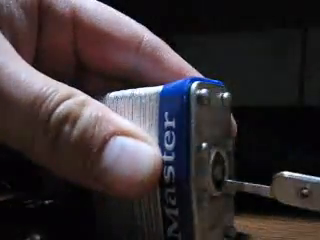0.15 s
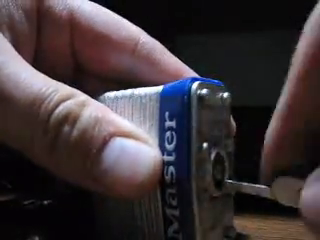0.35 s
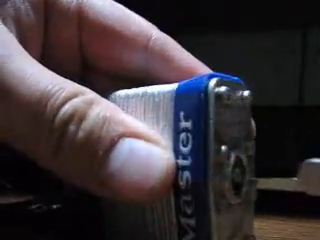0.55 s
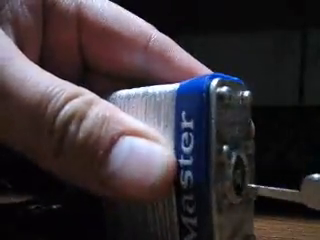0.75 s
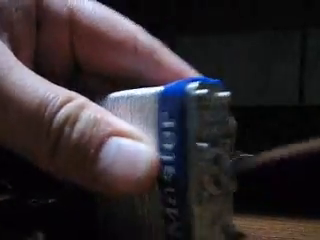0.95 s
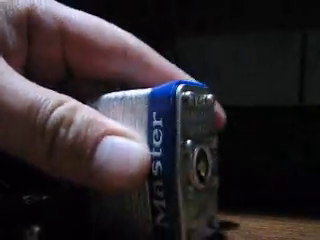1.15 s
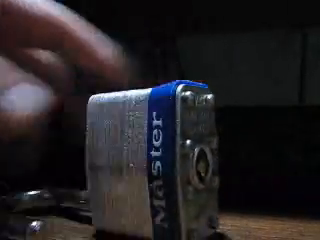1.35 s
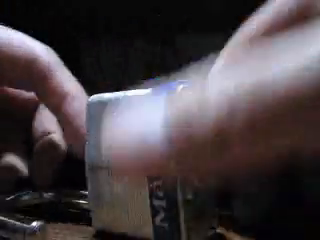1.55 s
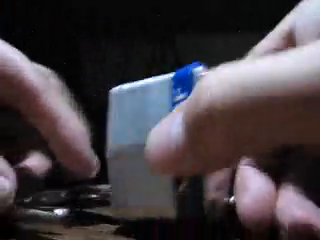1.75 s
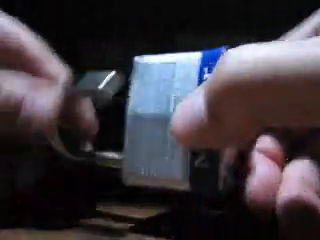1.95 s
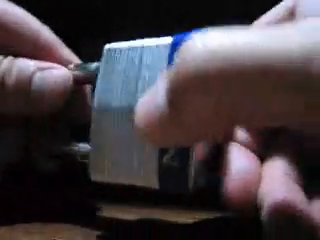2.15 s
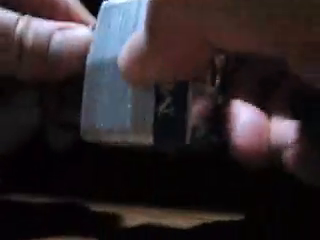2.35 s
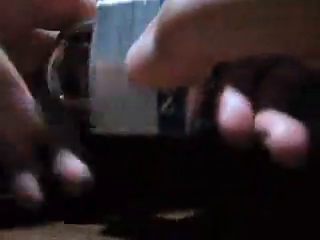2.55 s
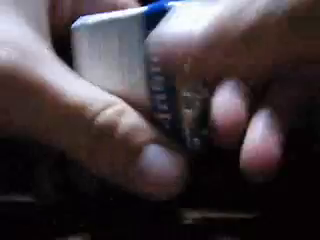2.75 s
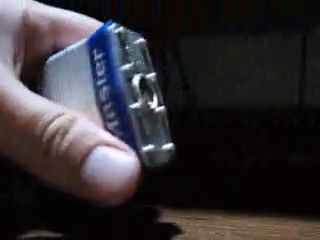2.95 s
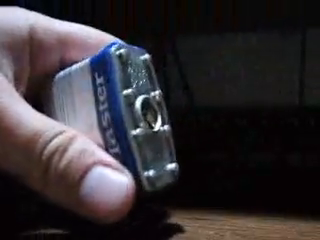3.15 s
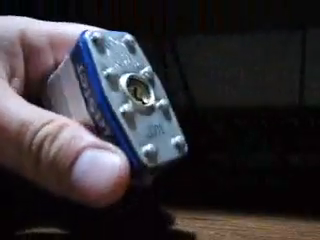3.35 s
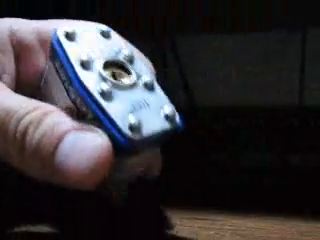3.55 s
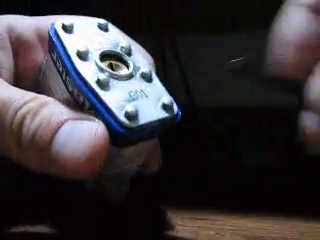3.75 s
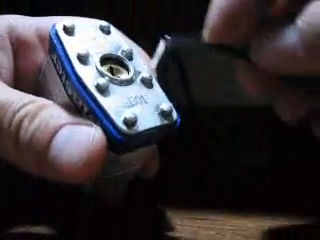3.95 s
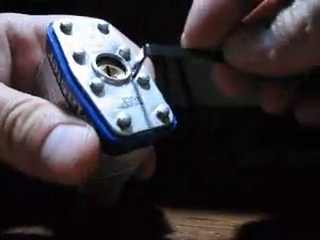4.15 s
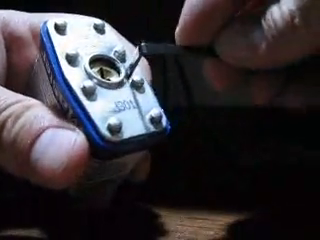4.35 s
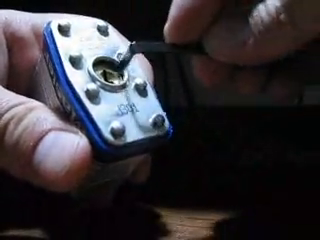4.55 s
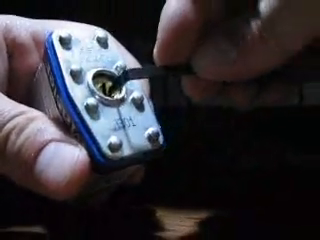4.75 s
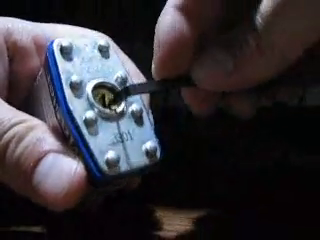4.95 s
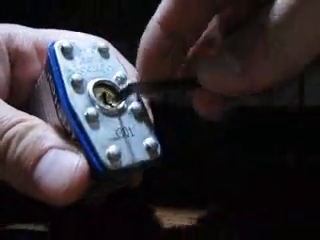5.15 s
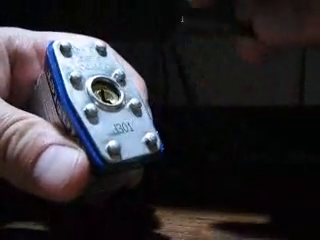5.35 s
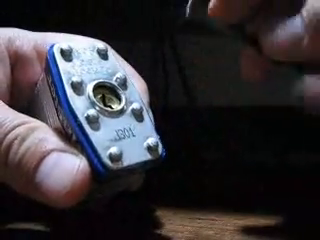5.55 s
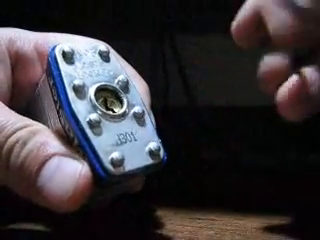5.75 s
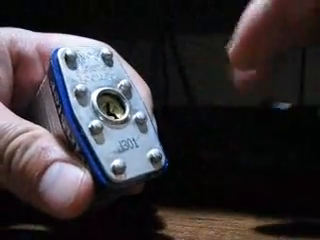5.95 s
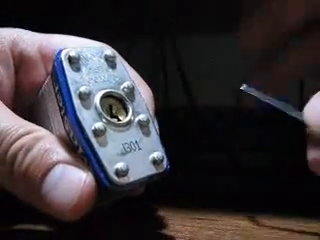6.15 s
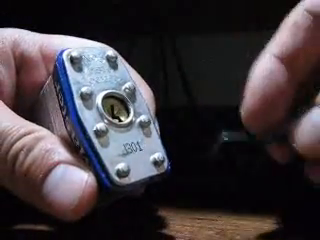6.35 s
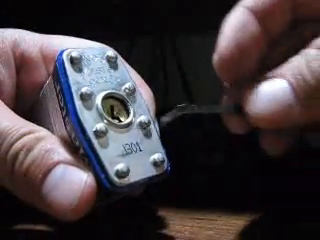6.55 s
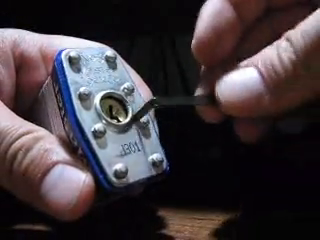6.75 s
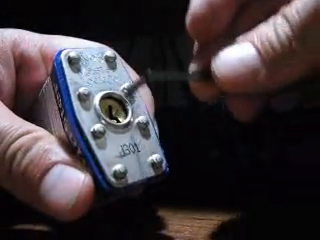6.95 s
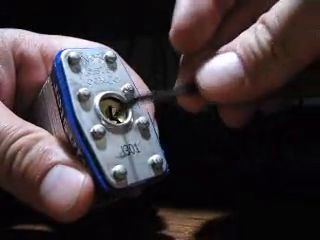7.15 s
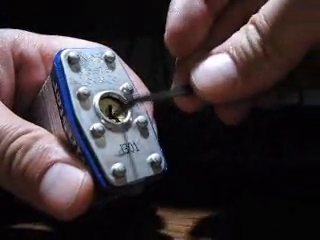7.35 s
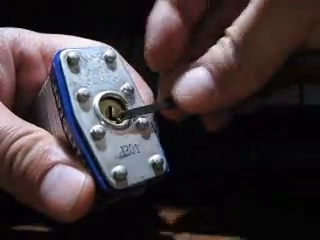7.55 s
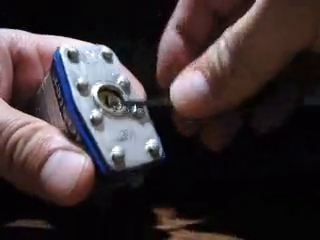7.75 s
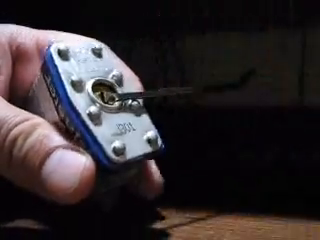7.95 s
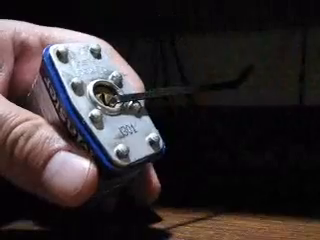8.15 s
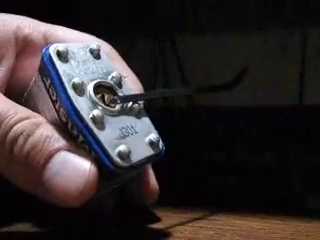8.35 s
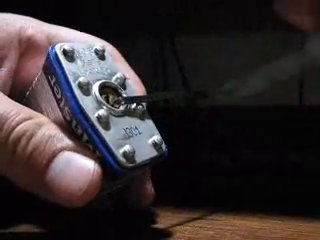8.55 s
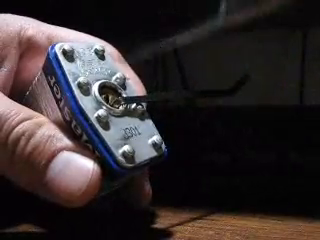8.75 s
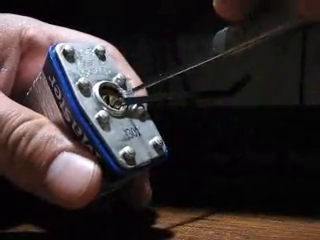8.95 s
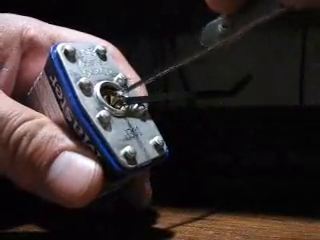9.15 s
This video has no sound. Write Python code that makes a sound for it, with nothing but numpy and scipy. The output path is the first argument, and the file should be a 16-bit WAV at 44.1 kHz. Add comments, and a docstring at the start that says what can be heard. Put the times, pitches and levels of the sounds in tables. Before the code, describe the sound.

A thin pick rakes out of a padlock with crisp, slightly ringing ticks and scrapes; fingers bump the metal body and the shackle is pushed home in dry, violent snaps. The lock is turned with a few hard clicks, then a wrench is probed in with sparse delicate ticks, soft rubbing and a late cluster of clacks. Close microphones, short indoor reflections, soft steady fan noise.

```python
"""A laminated steel padlock is handled close to the microphone, over a wooden desk in a quiet room.
A pick rakes out of the keyway, the shackle snaps shut, the lock is turned over and a tension wrench
ticks its way in: filtered noise bursts for blows, stick-slip grains for sliding steel and skin.
Fingers rub and bump the body, a fan hums in noise bands and faint tones, and the recorder's limiter
ducks after the hardest snaps."""
import sys
import numpy as np
from scipy import signal
from scipy.fft import rfft, irfft, next_fast_len
from scipy.io import wavfile
from scipy.ndimage import uniform_filter1d, minimum_filter1d

SR = 44100
rng = np.random.default_rng(int(sys.argv[2]) if len(sys.argv) > 2 else 0)


def generate_wav(sig):
    """Save sig (samples, or channels by samples) to the path in sys.argv[1] as 16-bit PCM at SR."""
    pcm = np.round(np.clip(np.atleast_2d(sig).T, -1, 1) * 32767).astype(np.int16)
    wavfile.write(sys.argv[1], SR, pcm)


N = 406161  # samples
LEAD_S = .01  # faint noise rising into each impact

# tool and pin contacts: (time [s], relative level [dB], brightness [Hz])
CONTACTS = [(0.0372, -7, 3400), (0.1124, 4, 3500), (0.1626, 0, 5800), (0.2023, -3.5, 3900),
            (0.2149, -6, 6500), (0.2425, -6, 4800), (0.258, -4, 5500), (0.2977, -7, 5800),
            (0.3024, -5, 6200), (0.3346, -6, 6400), (0.3643, -5, 6000), (0.3832, -5, 6800),
            (0.4157, -3, 6500), (0.4424, -7, 5600), (0.4642, -3.5, 6500), (0.5585, -8, 5600),
            (0.8233, -15.5, 6100), (0.9867, -7, 5600), (1.0207, -5, 7000), (1.052, -7, 7200),
            (1.0885, -4, 7000), (1.2153, -5.5, 5800), (1.2705, -4, 5400), (1.303, 6, 2100),
            (1.3174, 3.5, 3000), (1.3894, -2, 2900), (1.4148, -6, 6200), (1.432, -4, 4800),
            (1.458, -4, 6600), (1.8014, -1.5, 3000), (1.8152, -9, 3600), (2.0236, -10, 6500),
            (2.082, -17, 6300), (2.212, -19, 7200), (2.2558, -13, 2600), (2.2855, -9, 2800),
            (3.4672, 0, 5900), (3.474, -3, 5800), (3.6569, 4.5, 3800), (3.6645, 1, 3200),
            (4.3301, -8, 6900), (4.6865, -10.5, 6600), (4.7454, -15, 4700), (4.7732, -15, 4400),
            (5.0505, -13, 5000), (5.2687, -15.5, 5200), (5.3083, -11, 5200), (6.7447, -12.5, 5800),
            (6.9846, -18, 6700), (7.3022, -8.5, 8200), (7.3223, -6.5, 7300), (7.4896, -12, 6300),
            (7.68, -16, 5200), (7.6919, -13, 4200), (7.7523, -15.5, 6300), (7.9765, -16, 6500),
            (7.9922, -16, 5200), (8.0345, -18, 7200), (8.0432, -13, 5400), (8.0484, -14.5, 5000),
            (8.2302, -2, 3600), (8.2493, -4.5, 2200), (8.27, -9, 2400), (8.323, -10, 1900),
            (8.354, -10, 2500), (8.374, -7, 2900), (8.6095, -16.5, 4200), (8.708, -21, 7000),
            (8.7998, -14, 8300), (9.1475, -13, 6600)]


def undb(db):
    """Decibels to amplitude."""
    return 10 ** (np.asarray(db) / 20)


def unit(x):
    """Scale to rms 1."""
    return x / np.sqrt(np.mean(x ** 2))


def colour(x, points):
    """Filter by a spectrum of (frequency [Hz], gain [dB]) points, linear in dB over log frequency."""
    hz, db = np.transpose(points)
    size = next_fast_len(N + 4096)
    f = np.arange(size // 2 + 1) * SR / size
    gain = undb(np.interp(np.log(f + 1), np.log(hz), db))
    return irfft(rfft(x, size) * gain, size)[..., :N]


def resonate(x, hz, width_hz):
    """Two-pole band-pass, gain 1 at the centre."""
    hz = min(hz, .45 * SR)
    g, k = np.tan(np.pi * hz / SR), width_hz / hz
    numerator = [g * k, 0, -g * k]
    denominator = [1 + g * k + g * g, 2 * g * g - 2, 1 - g * k + g * g]
    return signal.lfilter(numerator, denominator, x)


def resonate_twice(x, hz, width_hz):
    """Two equal band-passes in series: steeper skirts."""
    return resonate(resonate(x, hz, width_hz), hz, width_hz)


def add(track, s, sound):
    """Mix a sound in at time s."""
    i = max(int(s * SR), 0)
    track[:, i:i + sound.shape[-1]] += sound[..., :N - i]


def swell(s, half_s):
    """One stroke: level rises, peaks at time s and trails off."""
    out = np.zeros(N)
    start, stop = max(int((s - 10 * half_s) * SR), 0), min(int((s + 10 * half_s) * SR), N)
    near = np.arange(start, stop)
    out[near] = (1 + ((near / SR - s) / half_s) ** 2 / 10) ** -10
    return out


def friction(rate_hz, scatter_db, slip_s, spectrum):
    """Stick-slip: slips of uneven size at random moments, each a brief burst; rms 1."""
    size = undb(scatter_db * np.clip(rng.standard_normal(N), -2, 2))
    slips = (rng.random(N) < rate_hz / SR) * size
    energy = signal.lfilter([1], [1, -np.exp(-1 / (slip_s * SR))], slips ** 2)
    return unit(colour(rng.standard_normal((2, N)) * np.sqrt(energy), spectrum))


def contact(hz, width, decay_s, rattle_db, rattle_s, rebound_db=-11, size=6000):
    """One blow, shared and opposed part: faint noise rising into the impact, a rebound, a weak rattle."""
    t = np.arange(size) / SR - LEAD_S
    lead_in_db, rebound_at_s = -22, rng.uniform(.001, .004)
    impact = np.exp(-np.abs(t) / decay_s)
    rattle = undb(rattle_db) * np.exp(-np.abs(t) / rattle_s)
    rebound = undb(rebound_db) * np.exp(-np.abs(t - rebound_at_s) / decay_s) * (t > rebound_at_s)
    lead_in = undb(lead_in_db) * (1 + t / LEAD_S) ** 2
    envelope = np.where(t < 0, lead_in, impact + rattle + rebound)
    chatter = rng.standard_normal((2, size)) * envelope
    blow = resonate_twice(chatter, hz, width * hz)  # width re hz
    # the filter must not change the energy
    return .5 * blow * np.linalg.norm(envelope) / np.linalg.norm(blow, axis=1, keepdims=True)


def tail(x, wet_db, t60_s, size=16000):
    """Dense decaying response to x, as shared and opposed part."""
    t = np.arange(size) / SR
    response = rng.standard_normal((2, size)) * np.exp(-np.log(1000) * t / t60_s) * (t > .002)
    response /= np.sqrt(np.sum(response ** 2) / 2)
    return undb(wet_db) * signal.fftconvolve(x[None], response, axes=1)[:, :N]


def sliding():
    """How hard flat faces and sharp edges rub over time, one row each."""
    # steel on steel: (time [s], half length [s], flat faces [dB], sharp edges [dB]), relative levels
    strokes = [(-0.003, 0.019, -28, -18.5), (0.158, 0.056, -31.5, -39), (0.38, 0.13, -39, -25.5),
               (1.046, 0.06, -63, -27.5), (1.309, 0.036, -22.5, -19.5), (1.427, 0.057, -23, -22),
               (1.714, 0.018, -40.5, -52), (1.81, 0.033, -28.5, -35.5), (2.055, 0.051, -43, -42),
               (2.315, 0.036, -29.5, -30), (2.392, 0.01, -38, -26), (3.476, 0.044, -28, -26.5),
               (3.575, 0.022, -30, -40), (3.682, 0.054, -23, -37), (8.242, 0.021, -22.5, -55)]
    return sum(undb(db)[:, None] * swell(s, half_s) for s, half_s, *db in strokes)


def scrapes(flat_gain, edge_gain):
    """Flat faces grate in the middle range, sharp edges rasp above them in short, separate grains."""
    # grating spectrum: (frequency [Hz], relative level [dB])
    flat_spectrum = [(100, -8), (700, 0), (1500, 2), (2400, 5), (4000, 0.5), (5500, -3.5), (9000, -19)]
    # rasping spectrum: (frequency [Hz], relative level [dB])
    edge_spectrum = [(250, -53), (750, -16.5), (1800, -11.5), (2250, -1), (7400, -1), (8600, -2.5),
                     (10000, -19.5), (14000, -10)]
    flat = friction(rate_hz=900, scatter_db=4.5, slip_s=.0009, spectrum=flat_spectrum)
    edge = friction(rate_hz=800, scatter_db=5.5, slip_s=.0005, spectrum=edge_spectrum)
    return flat * flat_gain + edge * edge_gain


def fingers(effort):
    """Skin creaks over the plates, with every stroke and every change of grip, and bumps the lock."""
    # grip shifts, skin drags: (time [s], half length [s], relative level [dB])
    grip_shifts = [(-0.02, 0.082, -29), (0.614, 0.034, -34.5), (0.829, 0.0073, -31), (1.067, 0.076, -24.5),
                   (1.807, 0.041, -33), (7.74, 0.089, -41.5)]
    # soft knocks of fingers and desk: (time [s], relative level [dB], brightness [Hz], decay [s])
    soft_knocks = [(0.01, -20, 435, 0.0053), (0.556, -26.5, 392, 0.0079), (1.304, -0.5, 890, 0.0077),
                   (1.633, -31, 280, 0.007), (1.863, -16, 790, 0.001), (3.412, -24.5, 228, 0.011),
                   (5.661, -26.5, 256, 0.017), (8.172, -20.5, 258, 0.0019), (8.191, -21, 168, 0.0025)]
    # creak spectrum: (frequency [Hz], relative level [dB])
    skin_spectrum = [(30, -18), (110, -13), (220, -1), (400, -3), (1300, -9.5), (2500, -36.5)]
    hand_slip_db = -18  # skin re flat faces: the hand that drives a stroke slips a little too
    firm_grip_db = -28.5  # pressure from which skin creaks at its brightest
    pressure = undb(hand_slip_db) * effort
    pressure = pressure + sum(undb(db) * swell(s, half_s) for s, half_s, db in grip_shifts)
    creak = friction(rate_hz=480, scatter_db=4.2, slip_s=0.0026, spectrum=skin_spectrum)
    soft = colour(creak, [(380, 1), (1300, -9)])
    firmness = np.minimum(pressure / undb(firm_grip_db), 1)
    out = pressure * (soft + firmness * (creak - soft))
    for s, db, hz, decay_s in soft_knocks:
        knock = contact(hz, width=1.84, decay_s=decay_s, rattle_db=-12.5, rattle_s=0.019)
        add(out, s - LEAD_S, undb(db) * knock)
    return out


def fan():
    """Steady air noise, two humming bands and the motor's faint tones."""
    # air noise spectrum: (frequency [Hz], relative level [dB])
    air_spectrum = [(25, -33), (53, -15.5), (79, -21), (170, -14.5), (237, -5.5), (340, -13.5), (729, -19),
                    (1150, -22), (4620, -28), (8100, -27), (10600, -49.5), (15000, -42.5)]
    # humming noise: (centre [Hz], half the width of each filter pass [Hz], relative level [dB])
    hum_bands = [(234, 30, -58), (742, 61, -52)]
    # motor tones: (frequency [Hz], relative level [dB])
    motor_tones = [(234.5, -49), (268, -59), (743, -62), (2008, -68)]
    air_db = -46.5
    t = np.arange(N) / SR
    out = undb(air_db) * unit(colour(rng.standard_normal((2, N)), air_spectrum))
    for hz, half_width_hz, db in hum_bands:
        hum = resonate_twice(rng.standard_normal((2, N)), hz, 2 * half_width_hz)
        out = out + undb(db) * unit(hum)
    for hz, db in motor_tones:
        out = out + np.sqrt(2) * undb(db) * np.sin(2 * np.pi * hz * t)
    return out


def clicks(contacts):
    """The tools catch on pins and keyway; light contacts are dry ticks, hard ones chatter and rattle."""
    thud_db = -20  # each contact also nudges the whole lock: level re the contact
    all_db = -2.5
    out = np.zeros((2, N))
    for s, db, hz in contacts:
        force = np.clip((db + 12) / 12, 0, 1)
        cycles = 3.5 + 3 * force  # decay time in periods
        rattle_db, rattle_s, rebound_db = -28 + 4 * force, .013, -18 + 7 * force
        tick = contact(hz, 1.05, cycles / hz, rattle_db, rattle_s, rebound_db)
        thud = contact(hz=1260, width=1.65, decay_s=0.0017, rattle_db=rattle_db, rattle_s=rattle_s)
        add(out, s - LEAD_S, undb(db) * (tick + undb(thud_db) * thud))
    return undb(all_db) * out


def hiss_swells():
    """Level over time of a faint hiss that swells around each contact."""
    half_s, hiss_db, top_db = 0.033, -41, -43  # half length, level re the contact, loudest hiss
    hiss = [undb(min(db + hiss_db, top_db)) * swell(s, half_s) for s, db, _ in CONTACTS]
    return np.max(hiss, axis=0)


def pick_ring(x, size=12000):
    """The thin pick rings: lightly damped steel modes driven by x."""
    # modes: (frequency [Hz], relative level [dB], t60 [s])
    modes = [(6520, -4, .09), (9320, 1, .2), (9905, 7, .17)]
    t = np.arange(size) / SR
    response = np.zeros(size)
    for hz, db, t60_s in modes:
        response += undb(db) * np.sin(2 * np.pi * hz * t) * np.exp(-np.log(1000) * t / t60_s)
    return signal.fftconvolve(x, response[None], axes=1)[:, :N]


def shackle():
    """The shackle strikes the latch; the hand damps it to a dry snap that the room faintly answers."""
    # pushed home and latching: (time [s], relative level [dB], chatter decay [s])
    latch_snaps = [(2.321, 7, 0.0013), (2.3314, 1.5, 0.002), (2.4034, 11, 0.0061), (2.4071, 16.5, 0.0017),
                   (2.5855, 13, 0.00025)]
    out = np.zeros((2, N))
    for s, db, decay_s in latch_snaps:
        snap = contact(4260, width=2.6, decay_s=decay_s, rattle_db=-30.5, rattle_s=0.015)
        add(out, s - LEAD_S, undb(db) * snap)
    return out + tail(out[0], wet_db=-27.5, t60_s=0.76)


def rubs():
    """Steel and fingertips rub in one spot: fine stick-slip through one broad resonance each."""
    # spots: (time [s], half length [s], relative level [dB], resonance [Hz])
    spots = [(2.863, 0.1, -46, 6400), (5.438, 0.037, -40.5, 5400), (5.714, 0.049, -45.5, 6300),
             (6.423, 0.069, -48.5, 8200), (6.81, 0.059, -44, 7040), (6.878, 0.052, -48, 2620),
             (7.898, 0.012, -27, 290), (8.279, 0.024, -30, 1680), (8.359, 0.032, -25.5, 1640),
             (8.43, 0.035, -42, 3000), (8.596, 0.025, -38.5, 6200), (8.798, 0.0054, -31.5, 2800)]
    width = .7  # of each filter pass, re the resonance
    slips = friction(rate_hz=900, scatter_db=3, slip_s=.0014, spectrum=[(500, 0), (9000, 0)])
    out = np.zeros((2, N))
    for s, half_s, db, hz in spots:
        out += undb(db) * swell(s, half_s) * unit(resonate_twice(slips, hz, width * hz))
    return out


def body(x, direct):
    """The stack of plates lends its resonances to whatever touches it; desk and room add one narrow low mode."""
    # resonances and one hollow of the lock in the hand, the first row a narrow mode of desk and room: (centre
    # [Hz], width [Hz], relative gain [dB])
    resonances = [(312, 19, 5), (434, 165, 4), (546, 34, -4), (764, 123, 9.5), (1080, 45, 3.5),
                  (1343, 138, 5), (2034, 150, 2.5), (2960, 140, 3.5), (3690, 310, 1), (5990, 35, 4),
                  (7270, 1250, 6.5)]
    return direct * (x + sum((undb(db) - 1) * resonate(x, hz, width_hz) for hz, width_hz, db in resonances))


def ports(x, apart_db):
    """Left and right from a shared and an opposed part; close ports hear nearly the same bass."""
    side = colour(x[1], [(130, -19), (380, -11), (700, -6.5), (1300, 1.5), (4400, -5.5), (8000, -1)])
    return x[0] + undb(apart_db) * side * np.array([[1], [-1]])


def scene():
    """Steel, fingers and room tone as the two microphone ports hear them."""
    # microphone response: (frequency [Hz], gain [dB])
    mic_response = [(5000, 2), (8000, 3.2), (11500, -1.5), (14500, -14)]
    flat_gain, edge_gain = sliding()
    steel = clicks(CONTACTS) + scrapes(flat_gain, np.hypot(edge_gain, hiss_swells()))
    # the pick springs free as it leaves the pins
    raking = np.interp(np.arange(N) / SR, [.15, .16, .5, .6], [0, 1, 1, 0])
    ring_db = -37
    steel = steel + undb(ring_db) * pick_ring(steel * raking) + shackle() + rubs()
    near = body(steel + fingers(flat_gain), direct=0.65)
    lock = near + tail(near[0], wet_db=-6.0, t60_s=0.12)  # desk and near walls
    left, right = ports(colour(lock, mic_response), apart_db=-4)
    # the keyway faces right, so the left port is shaded in the treble
    left = colour(left, [(1300, .5), (2400, -2), (5500, -.5), (8500, -3.5)])
    return np.array([left, right]) + ports(fan(), apart_db=-19.5)


def limiter(x, ceiling_db, release_db_per_s):
    """Looks ahead, turns down at once for a peak and comes back at a steady rate."""
    over_db = np.maximum(20 * np.log10(np.abs(x).max(axis=0) + 1e-9) - ceiling_db, 0)
    ramp_db = release_db_per_s * np.arange(N) / SR
    gain = undb(ramp_db - np.maximum.accumulate(over_db + ramp_db))
    return x * uniform_filter1d(minimum_filter1d(gain, size=65), size=65)


def record(dry):
    """The recorder limits the hardest snaps and cuts the top."""
    top_hz = 15600
    held = limiter(dry, ceiling_db=-1, release_db_per_s=50.5)
    return signal.sosfilt(signal.ellip(8, .2, 70, top_hz, fs=SR, output="sos"), held)


dry = scene()
out = record(dry)
generate_wav(out)
```